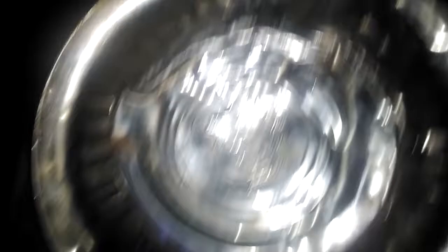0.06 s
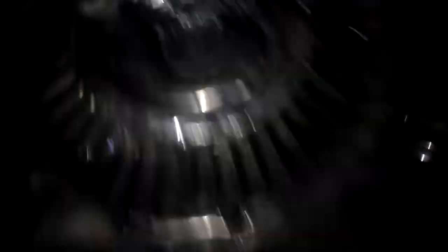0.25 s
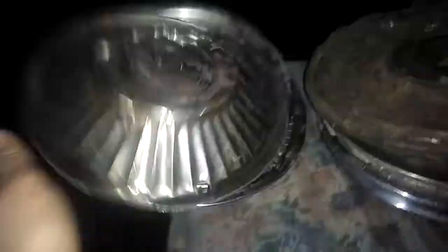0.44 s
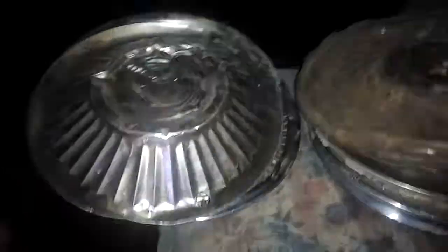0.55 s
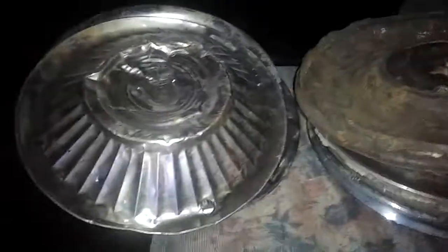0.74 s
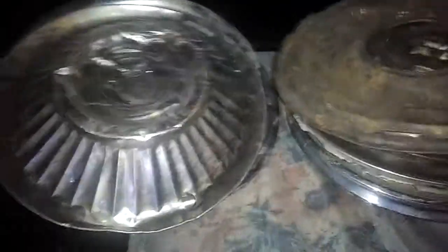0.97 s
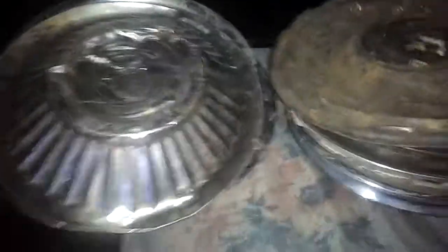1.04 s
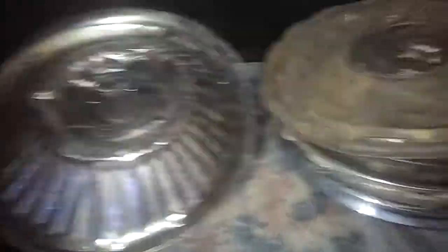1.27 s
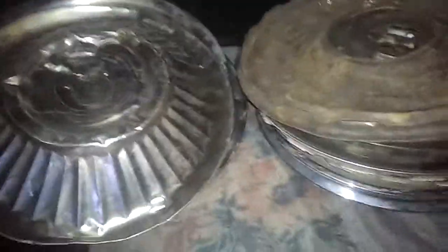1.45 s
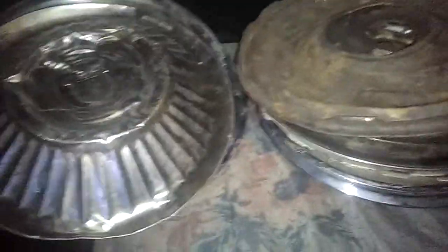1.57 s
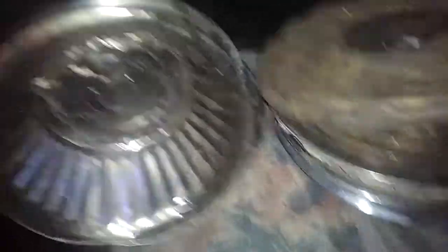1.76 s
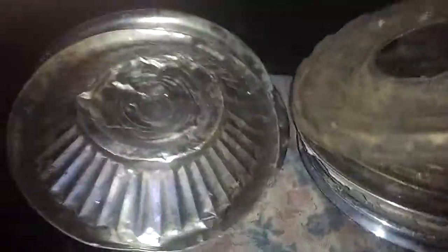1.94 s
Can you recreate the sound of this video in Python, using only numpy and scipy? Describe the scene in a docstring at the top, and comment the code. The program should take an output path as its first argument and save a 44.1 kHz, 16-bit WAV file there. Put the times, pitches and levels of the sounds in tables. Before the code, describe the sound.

Loud clang and rattle of a hubcap dropped on another, then a quieter hollow knock.

```python
"""A quiet garage: a pressed-metal hubcap is dropped on another. Blows and chatter excite the modes of both; the
caps overload a hand-held recorder, knock once more and ring out. A finger brushes the left microphone port and
cloth rustles, both as grainy friction noise. Then something dull is knocked three times, rings hollow, drags
softly and settles with a few faint taps and ticks."""
import sys
import numpy as np
from scipy import signal
from scipy.fft import rfft, irfft, next_fast_len
from scipy.io import wavfile
from scipy.ndimage import uniform_filter1d

SR = 44100
rng = np.random.default_rng(int(sys.argv[2]) if len(sys.argv) > 2 else 0)


def to_wav(sig):
    """Store sig (one row per channel, or 1-D mono) as 16-bit WAV at the path in sys.argv[1].

    Samples outside -1..1 are clipped; the rate is SR.
    """
    pcm = np.clip(np.atleast_2d(sig), -1, 1) * 32767
    pcm = np.round(pcm).astype(np.int16)
    wavfile.write(sys.argv[1], SR, pcm.T)  # frames by channels


N = 88200

# Spectra give relative density. Pan is left minus right.
# background hum (frequency [Hz], level [dB])
HUM_SPECTRUM = [(30, -8), (60, 0), (150, -3), (500, -18.5), (2000, -18.5), (15000, -32.5)]
# wall reverberation (frequency [Hz], T60 [s])
GARAGE_T60 = [(100, 0.5), (700, 0.7), (3000, 0.73), (12000, 0.19)]

# cloth rustle (time [s], level [dB], pan [dB])
CLOTH_ENVELOPE = [(0, -48.5, 3), (.055, -42, -0.5), (.125, -37, 2.5), (.6, -50, -1), (.75, -62, 3),
                  (.84, -71, 12), (.95, -61, 9), (1.02, -69, 14), (1.25, -85, -4), (1.27, -58, -4.5),
                  (1.33, -74.5, -6), (1.348, -64, -11), (1.351, -51.5, -7), (1.44, -48, -8),
                  (1.47, -32.5, -3.5), (1.5, -34.5, -5), (1.53, -43.5, -3), (1.62, -44.5, -4),
                  (1.66, -57, -4), (1.7, -49.5, -9), (1.86, -45, -5.5), (1.9, -50.5, -4), (1.93, -42.5, -3),
                  (2, -42, -2)]
# cloth friction (frequency [Hz], level [dB])
CLOTH_SPECTRUM = [(1200, -43), (2500, -3.5), (4000, -3.5), (7000, -3.5), (11800, -2.5), (15500, -8)]
# soft drag (time [s], level [dB])
DRAG_ENVELOPE = [(1.34, -79.5), (1.395, -38.5), (1.43, -55.5), (1.6, -46.5), (1.66, -55), (1.7, -51.5),
                 (1.9, -52), (2, -55.5)]
# drag friction (frequency [Hz], level [dB])
DRAG_SPECTRUM = [(100, -22), (400, -6.5), (800, -5), (1300, -12.5), (3000, -18), (5000, -55.5)]
# rim sliding in the hand (time [s], level [dB])
RIM_ENVELOPE = [(0, -72.5), (.058, -49.5), (.075, -38.5), (.15, -36), (.17, -84.5)]
# rim friction (frequency [Hz], level [dB])
RIM_SPECTRUM = [(59, -62.5), (100, -26.5), (481, 5), (1220, -3), (1750, 8), (3160, -34), (3660, -9.5),
                (5000, -40.5), (11000, -120)]
# finger on the port (frequency [Hz], level [dB])
BRUSH_SPECTRUM = [(200, -15), (400, -8), (900, -9), (2200, -5.5), (3900, -7.5), (5600, -2.5), (6600, 7),
                  (7600, 1), (9000, -13.5), (10300, -10.5), (12000, -10.5), (15500, -13.5)]
# grip shifts (time [s], level [dB])
THUMPS = [(.635, -50.5), (.905, -37), (0.924, -46.5)]
# knock of the caps' last contact, hollow ring of the dull knock, settling taps
# (time [s], level [dB], pitch [Hz], T60 [s], pan [dB])
CONTACT_TONES = [(.515, -20.5, 678, 0.17, -5), (0.516, -41.5, 176, 0.11, -6), (1.748, -49, 266, .2, -5),
                 (1.455, -31, 407.4, 0.32, 3), (1.456, -31.5, 605.5, 0.27, 1),
                 (1.681, -40.5, 772, 0.089, -7), (1.745, -43.5, 783, 0.4, -12), (1.814, -35, 338, 0.11, -3),
                 (1.814, -50, 1114, 0.2, -18), (1.83, -45, 475.6, 0.44, 5)]
# bright ticks (time [s], level [dB], pitch [Hz], pan [dB])
TICKS = [(1.868, -23, 2620, -8), (1.87, -22.5, 4720, 6), (1.868, -21, 5730, 0), (1.869, -20.5, 13100, 5)]

# contacts of the dull object (time [s], level [dB])
KNOCKS = [(1.397, -26.5), (1.453, -21.5), (1.466, -29.5)]
# its dense modes (frequency [Hz], level [dB])
KNOCK_SPECTRUM = [(40, -25.5), (124, -46), (260, -20), (450, 0), (850, -8.5), (1570, 1), (2200, -5),
                  (2700, -17.5), (6000, -26), (9000, -72)]
# their decay (frequency [Hz], T60 [s])
KNOCK_T60 = [(60, 0.18), (500, 0.37), (1500, 0.22), (5000, 0.42)]
# their stereo image (frequency [Hz], coherence [0..1])
KNOCK_COHERENCE = [(300, 1), (1500, 0.51), (5000, .1)]

# cap contacts (time [s], upper cap [dB], lower cap [dB], shimmer [dB])
BLOWS = [(.160, -5.5, -20.5, 0), (.222, -11.5, -36, -0.5), (0.264, -8, -42.5, -17),
         (0.346, -7.5, -39.5, -15.5), (.385, -9.5, -38, -21), (.444, -42, -48, -50),
         (.517, -15.5, -14, -21.5)]
# rattle between the caps (time [s], relative force [dB])
CHATTER_ENVELOPE = [(.158, -31.5), (.165, -1.5), (.24, 0), (.3, -5), (.36, -8.5), (.4, -48), (.45, -45),
                    (.52, -120)]
# upper cap modes, damped by its seat (frequency [Hz])
UPPER_HZ = [212, 331, 376, 580, 811, 942, 971, 1243, 1512, 1822, 2114]
# same order (level [dB], T60 [s])
UPPER_MODES = [(-21.5, .25), (-10, .33), (-24, 0.98), (-18.5, 0.1), (-5, 0.33), (-13, 0.6), (-12, 0.25),
               (-11, 0.64), (-4.5, 0.33), (-15, .35), (-10.5, 0.75)]
# upper cap modes that build after the drop; the close pair beats (frequency [Hz])
SWELL_HZ = [467, 492, 531, 761.6, 779.2, 872]
# same order (peak level [dB], time to peak [s], steepness [-])
SWELL_MODES = [(-14.5, 0.24, 7.37), (-8, 0.11, 5.7), (-14.5, 0.15, 2.6), (-11.5, 0.16, 2.7),
               (-8.5, 0.17, 3.4), (-4.5, .022, 1.5)]
# lower cap modes, free to ring (frequency [Hz])
LOWER_HZ = [772, 943, 1023, 1152, 1161, 1212, 1249, 1394, 1448, 1503, 1633, 2519, 3338]
# same order (level [dB], T60 [s], pan [dB])
LOWER_MODES = [(-14.5, 0.51, -6), (-8.5, 0.72, 0.5), (-15, .55, -2), (-3, 0.78, 5.5), (-19, 1.1, -2.5),
               (-23, 1, -6), (-12, .5, -2), (-16, .85, -2.5), (-16, 1.75, -11.5), (-20, 2.2, -7.5),
               (-12, 1.1, 5.5), (-17, 0.38, 0.5), (-5, .3, 6.5)]
# shimmer: dense small modes of the caps (frequency [Hz], level [dB])
SHIMMER_SPECTRUM = [(60, -44), (150, -18.5), (330, -6.5), (600, -5), (1100, -13), (2500, -11.5),
                    (4500, -9.5), (9000, -9), (15500, -13.5)]
# their decay (frequency [Hz], T60 [s])
SHIMMER_T60 = [(100, 0.2), (500, 0.4), (1500, 0.92), (2500, 0.7), (4000, 0.28), (8000, 0.14),
               (15000, 0.048)]
# their stereo image (frequency [Hz], coherence [0..1])
SHIMMER_COHERENCE = [(300, 1), (1000, 0.17), (2500, 0.97), (12000, 0.013)]


def amp(db):
    """dB to gain."""
    return 10 ** (np.asarray(db) / 20)


def unit_rms(x):
    """Scale to rms 1."""
    return x / np.sqrt(np.mean(x ** 2) + 1e-20)


def unit_onset(x):
    """Scale to rms 1 over the first 20 ms."""
    return x / np.sqrt(np.mean(x[:, :SR // 50] ** 2))


def along(points, hz):
    """Interpolate (frequency [Hz], value) on a log axis."""
    knots_hz, values = np.transpose(points)
    return np.interp(np.log(hz + 1), np.log(knots_hz + 1), values)


def curves(rows):
    """Per-sample values of each column after the time."""
    times_s, *columns = np.transpose(rows)
    return [np.interp(np.arange(N) / SR, times_s, column) for column in columns]


def pan(db):
    """Left and right gains as two rows."""
    return amp(np.vstack([db / 2, -db / 2]))


def filtered(x, response):
    """Apply a frequency response."""
    size = next_fast_len(N + 8192)
    return irfft(rfft(x, size) * response(np.fft.rfftfreq(size, 1 / SR)), size)[..., :N]


def grainy_noise(spectrum, shared, grain_db):
    """Stereo noise with a flickering level, rms 1."""
    grain = amp(grain_db * unit_rms(uniform_filter1d(rng.standard_normal(N), size=90)))
    common, own = rng.standard_normal(N), rng.standard_normal((2, N))
    noise = grain * (shared * common + (1 - shared) * own)
    return unit_rms(filtered(noise, lambda hz: amp(along(spectrum, hz))))


def modes(hz, gains, t60_s, length_s, waver_db=0, rise_s=0.002):
    """Stereo impulse response of damped sines, alternating in sign; gains is 2 x modes."""
    t = np.arange(int(length_s * SR)) / SR
    knots_db = rng.standard_normal((len(hz), 30)) * waver_db
    drift_db = np.array([np.interp(t, np.linspace(0, length_s, 30), row) for row in knots_db])
    waves = amp(drift_db - 60 * t / t60_s[:, None]) * np.sin(2 * np.pi * np.outer(hz, t))
    signs = (-1) ** np.arange(len(hz))
    return (gains * signs) @ waves * (1 - np.exp(-t / rise_s))


def dense_modes(spectrum, t60s, coherence, rise_s):
    """Stereo impulse response of unresolved modes: noise with a decay per band."""
    hz, t, noise = signal.stft(rng.standard_normal((2, 7 * SR // 10)), SR, nperseg=256)
    width_rad = np.arccos(along(coherence, hz))[:, None] / 2
    level_db = along(spectrum, hz)[:, None] - 60 * t / along(t60s, hz)[:, None]
    mid, side = [np.cos(width_rad), np.sin(width_rad)] * noise * amp(level_db)
    tail = signal.istft(np.array([mid + side, mid - side]), SR, nperseg=256)[1]
    attack = 1 - np.exp(-np.arange(tail.shape[1]) / SR / rise_s)
    return unit_onset(tail * attack)


def impulses(times_s, levels_db):
    """One force impulse per contact."""
    return np.bincount(np.round(np.asarray(times_s) * SR).astype(int), amp(levels_db), N)


def excite(force, body):
    """Convolve a force with a stereo impulse response."""
    return signal.fftconvolve(force[None], body, axes=1)[:, :N]


def hum():
    """Faint low noise of the garage."""
    return amp(-72.5) * grainy_noise(HUM_SPECTRUM, shared=0.34, grain_db=-2.5)


def garage_reverb(x, wet_db=-15.5):
    """Diffuse wall reflections."""
    tail = dense_modes([(100, 0)], GARAGE_T60, coherence=[(300, 0.0068), (2000, 0)], rise_s=0.01)
    return amp(wet_db) * excite(x.mean(axis=0), tail / np.linalg.norm(tail[0]))


def handling():
    """Friction noise: cloth, a soft drag, the rim sliding through the hand."""
    cloth_db, pan_db = curves(CLOTH_ENVELOPE)
    drag_db, rim_db = curves(DRAG_ENVELOPE)[0], curves(RIM_ENVELOPE)[0]
    cloth = amp(cloth_db) * pan(pan_db) * grainy_noise(CLOTH_SPECTRUM, shared=0.092, grain_db=1.5)
    drag = amp(drag_db) * pan(-0.5) * grainy_noise(DRAG_SPECTRUM, shared=0.44, grain_db=0.5)
    rim = amp(rim_db) * pan(3.1) * grainy_noise(RIM_SPECTRUM, shared=0.48, grain_db=1.5)
    return cloth + drag + rim


def finger_brush(start_s=0.859, end_s=0.913, hold_s=0.012, release_s=0.0031, rise_db_per_s=518.5):
    """A finger slides ever harder over the left port, then stops."""
    t = np.arange(N) / SR
    left_db, right_db = -19.5, -51.5
    rise = amp(-rise_db_per_s * np.maximum(end_s - hold_s - t, 0))
    gate = (t > start_s) * np.exp(-np.clip(t - end_s, 0, 1) / release_s)
    friction = grainy_noise(BRUSH_SPECTRUM, shared=0.55, grain_db=-3.0)
    return amp([[left_db], [right_db]]) * rise * gate * friction


def grip_thumps(nominal_hz=65.4, peak_s=0.0107):
    """The grip shifts: low pulses, pitch and phase random per channel."""
    out, t = np.zeros((2, N + SR)), np.arange(SR // 4) / SR
    envelope = t / peak_s * np.exp(1 - t / peak_s)
    for start_s, db in THUMPS:
        hz = nominal_hz * rng.uniform(0.74, 1.1, (2, 1))
        wave = np.sin(2 * np.pi * (hz * t + rng.random((2, 1))))
        start = round(start_s * SR)
        out[:, start:start + len(t)] += amp(db) * envelope * wave
    return out[:, :N]


def contact_tones(tick_t60_s=0.0054):
    """The caps' last knock, the dull knock's hollow ring, taps, ticks: noise-roughened damped sines."""
    out, t = np.zeros((2, N + SR)), np.arange(SR // 4) / SR
    ticks = [(start_s, db, hz, tick_t60_s, pan_db) for start_s, db, hz, pan_db in TICKS]
    for start_s, db, hz, t60_s, pan_db in CONTACT_TONES + ticks:
        rough = 1 + 0.51 * unit_rms(uniform_filter1d(rng.standard_normal(len(t)), int(3 * SR / hz)))
        envelope = amp(db - 60 * t / t60_s) * (1 - np.exp(-t * hz / 2))
        start = round(start_s * SR)
        out[:, start:start + len(t)] += pan(pan_db) * envelope * rough * np.sin(2 * np.pi * hz * t)
    return out[:, :N]


def knocks():
    """A dull object, struck at a new spot each time."""
    out = np.zeros((2, N))
    for start_s, db in KNOCKS:
        body = dense_modes(KNOCK_SPECTRUM, KNOCK_T60, KNOCK_COHERENCE, rise_s=0.0011)
        out += excite(impulses([start_s], [db]), body)
    return pan(-4) * out


def chatter_force(drop_s, rate_per_s=450, spread_db=3):
    """The caps rattle after the drop: impulses of random time, size and sign."""
    contact = (rng.random(N) < rate_per_s / SR) & (np.arange(N) > drop_s * SR)
    level_db = curves(CHATTER_ENVELOPE)[0] + spread_db * rng.standard_normal(N)
    sign = rng.choice([-1, 1], N)
    return contact * sign * amp(level_db) * np.sqrt(20 / rate_per_s)


def shimmer(times_s, levels_db, chatter, spots=6):
    """Dense cap modes: a new spot per blow, chatter scattered over a few more."""
    spot = rng.integers(0, spots, N)
    forces = [impulses([start_s], [db]) for start_s, db in zip(times_s, levels_db)]
    forces += [chatter * (spot == k) for k in range(spots)]
    return sum(excite(force, dense_modes(SHIMMER_SPECTRUM, SHIMMER_T60, SHIMMER_COHERENCE, rise_s=11e-5))
               for force in forces)


def glints(force, count=450, gain_db=-1):
    """High cap modes at random pitches, weighted differently at each port."""
    hz = 2300 + 12900 * rng.random(count) ** 1.4
    gains = rng.standard_normal((2, count)) * amp(along(SHIMMER_SPECTRUM, hz))
    t60_s = 0.22 * np.exp(0.15 * rng.standard_normal(count))
    return amp(gain_db) * excite(force, unit_onset(modes(hz, gains, t60_s, length_s=0.7)))


def swells(drop_s):
    """Strong upper cap modes build from the drop, peak and fade."""
    t = np.maximum(np.arange(N) / SR - drop_s, 0)
    return sum(amp(db) * (t / peak_s * np.exp(1 - t / peak_s)) ** steepness * np.sin(2 * np.pi * hz * t)
               for hz, (db, peak_s, steepness) in zip(SWELL_HZ, SWELL_MODES))


def upper_cap(force):
    """Damped by its seat: a short ring."""
    db, t60_s = np.transpose(UPPER_MODES)
    return excite(force, modes(UPPER_HZ, amp([db, db]), t60_s, length_s=0.54))


def lower_cap(force):
    """Free to ring: long modes, each wavering slowly in level."""
    db, t60_s, pan_db = np.transpose(LOWER_MODES)
    return excite(force, modes(LOWER_HZ, amp(db) * pan(pan_db), t60_s, length_s=2, waver_db=2))


def hubcaps(chatter_to_upper_db=-6.5):
    """Blows drive both caps and the bright crash; chatter drives the upper cap and the crash."""
    times_s, upper_db, lower_db, shimmer_db = np.transpose(BLOWS)
    drop_s = min(times_s)
    chatter = chatter_force(drop_s)
    upper = upper_cap(impulses(times_s, upper_db) + amp(chatter_to_upper_db) * chatter) + swells(drop_s)
    lower = lower_cap(impulses(times_s, lower_db))
    crash = shimmer(times_s, shimmer_db, chatter) + glints(impulses(times_s, shimmer_db) + chatter)
    return pan(1.5) * (upper + crash) + lower


def scene(caps_gain_db=-6, left_lag_samples=5):
    """Reverberant impacts and dry close sounds over the hum."""
    impacts = amp(caps_gain_db) * hubcaps() + knocks()
    impacts[0] = np.roll(impacts[0], left_lag_samples)
    close = contact_tones() + grip_thumps() + finger_brush() + handling()
    return impacts + garage_reverb(impacts) + close + hum()


def record(dry):
    """Soft input overload, then bass cut and band limit."""
    ceiling, hardness = 0.76, 4
    low_cut_hz, top_hz, edge_hz = 85, 15633, 120

    def passband(hz):
        high_pass = 1j * hz / (low_cut_hz + 1j * hz)
        low_pass = np.sin(np.pi / 2 * np.clip((top_hz - hz) / edge_hz, 0, 1)) ** 2
        return high_pass * low_pass

    clipped = dry / (1 + np.abs(dry / ceiling) ** hardness) ** (1 / hardness)
    return np.clip(filtered(clipped, passband), -1, 1)


dry = scene()
out = record(dry)
to_wav(out)
```